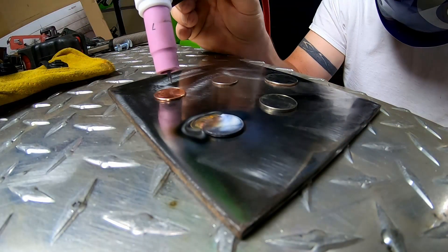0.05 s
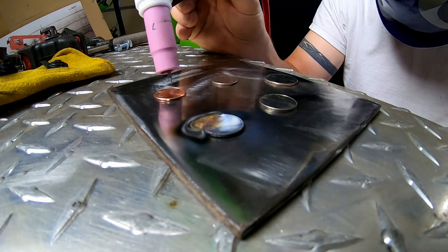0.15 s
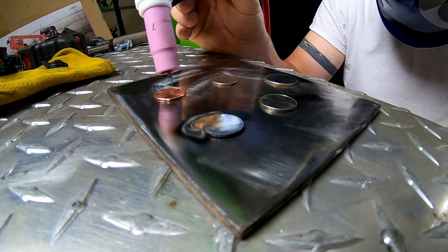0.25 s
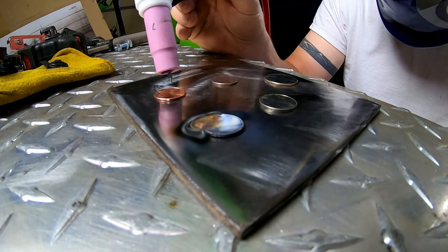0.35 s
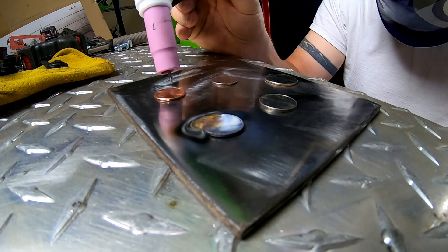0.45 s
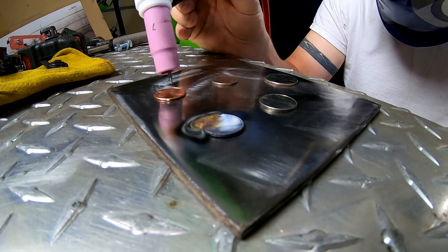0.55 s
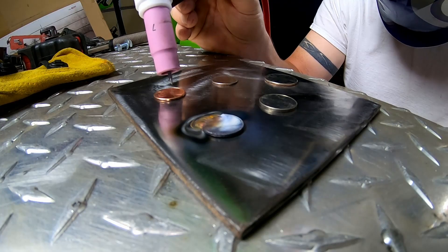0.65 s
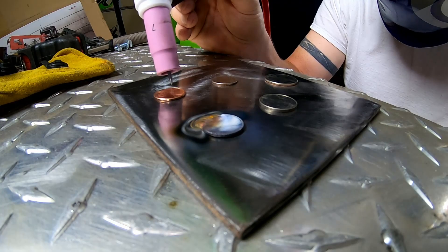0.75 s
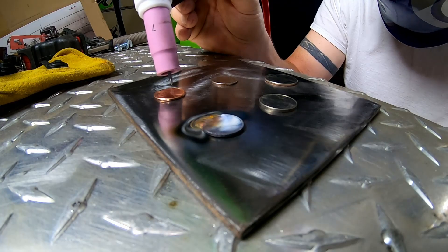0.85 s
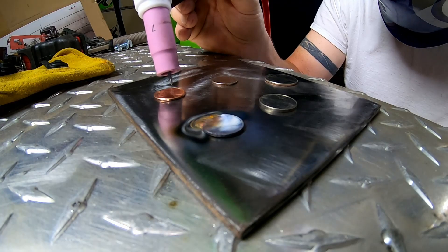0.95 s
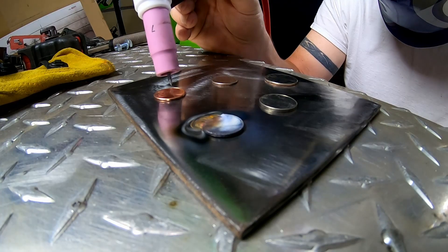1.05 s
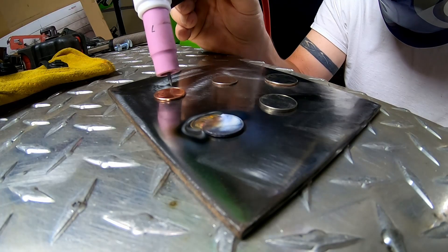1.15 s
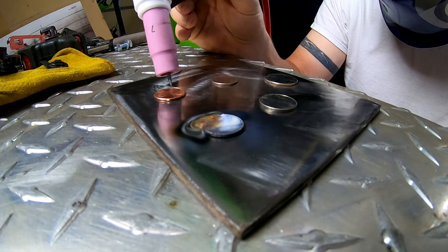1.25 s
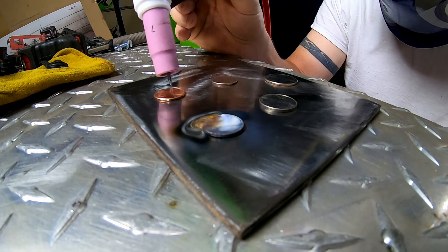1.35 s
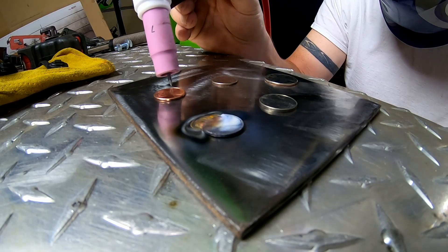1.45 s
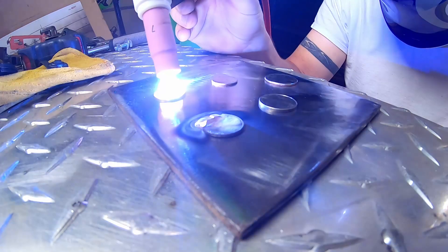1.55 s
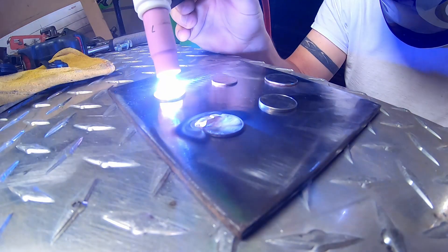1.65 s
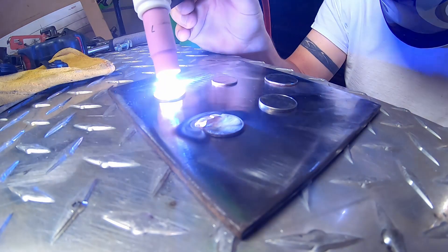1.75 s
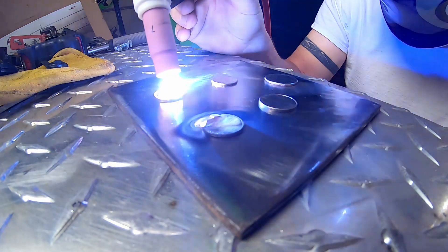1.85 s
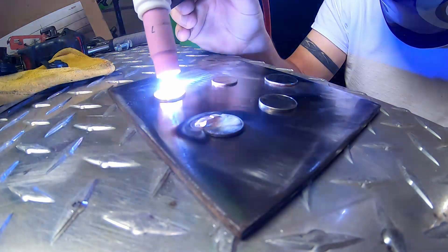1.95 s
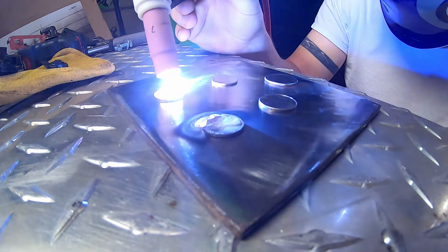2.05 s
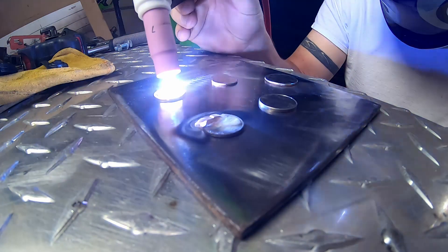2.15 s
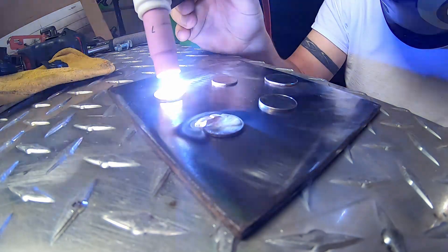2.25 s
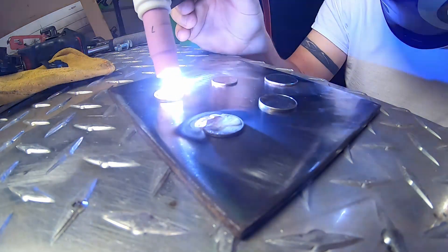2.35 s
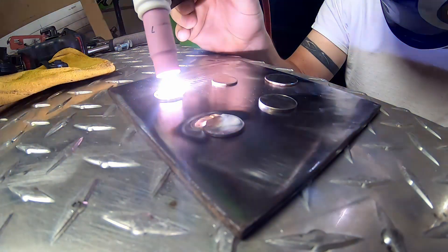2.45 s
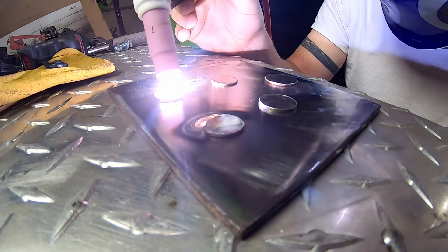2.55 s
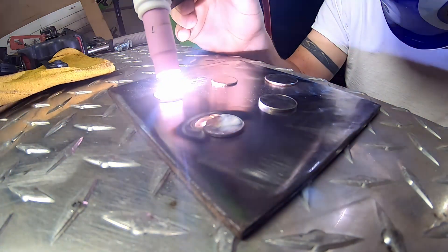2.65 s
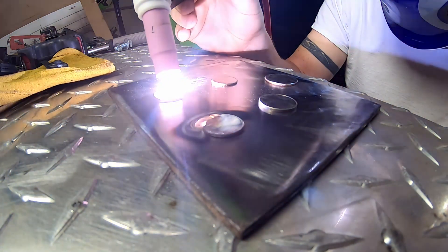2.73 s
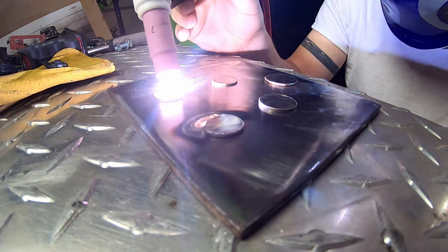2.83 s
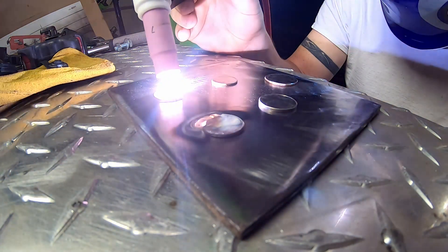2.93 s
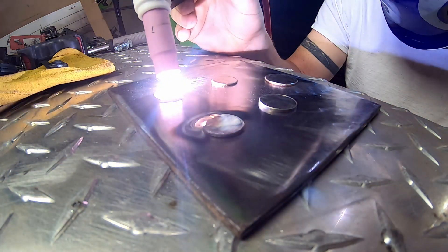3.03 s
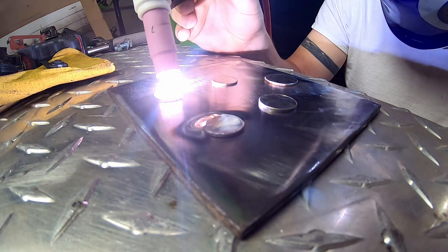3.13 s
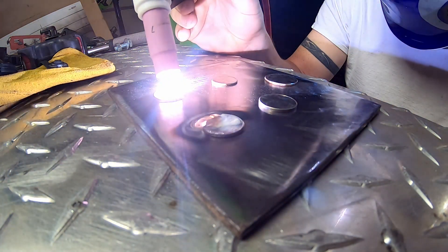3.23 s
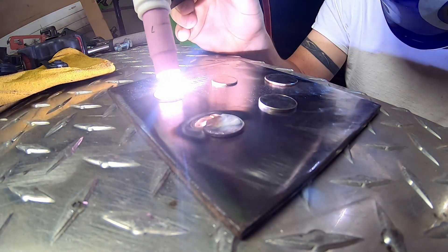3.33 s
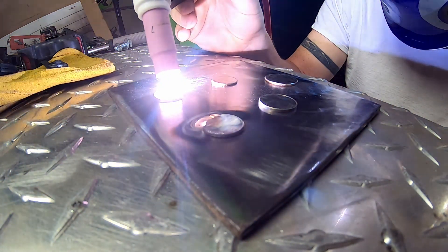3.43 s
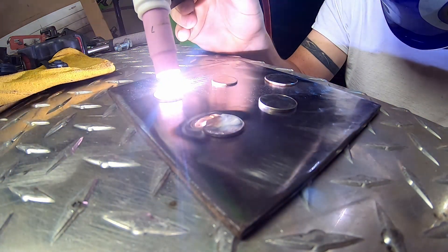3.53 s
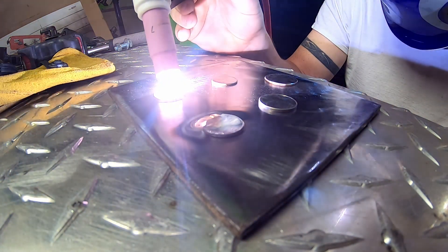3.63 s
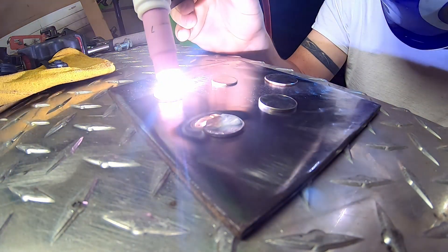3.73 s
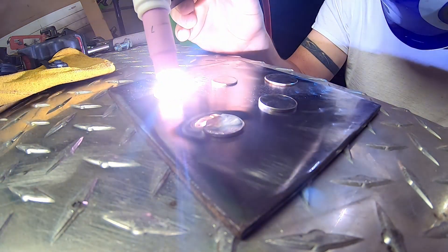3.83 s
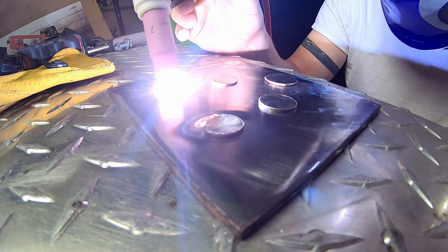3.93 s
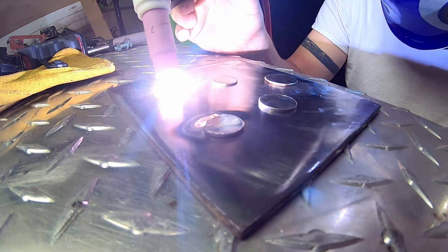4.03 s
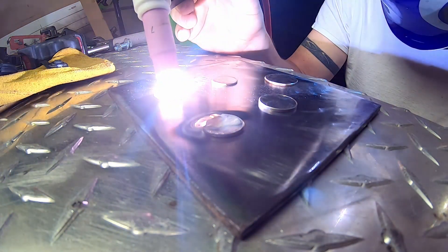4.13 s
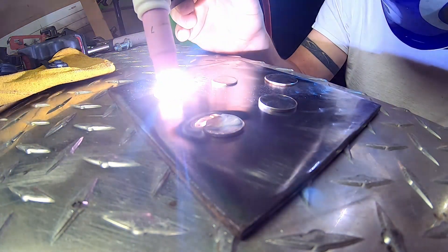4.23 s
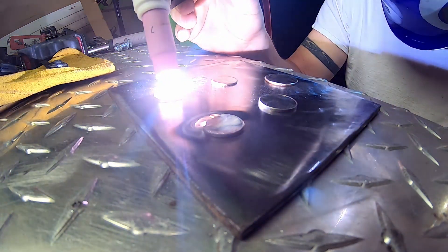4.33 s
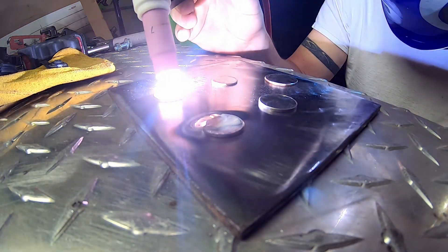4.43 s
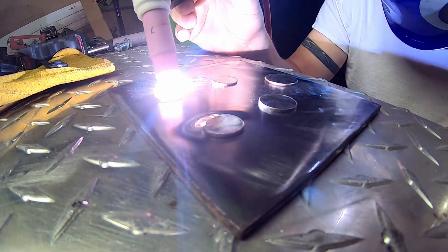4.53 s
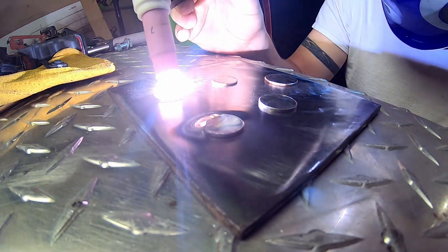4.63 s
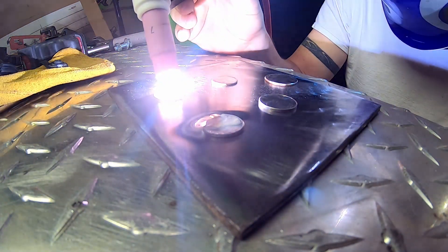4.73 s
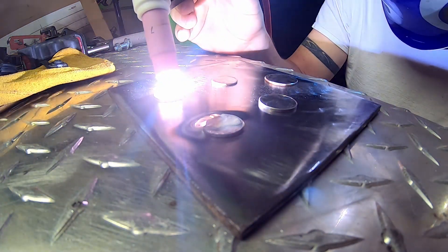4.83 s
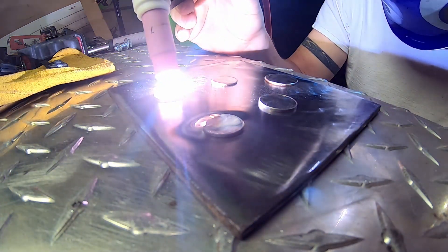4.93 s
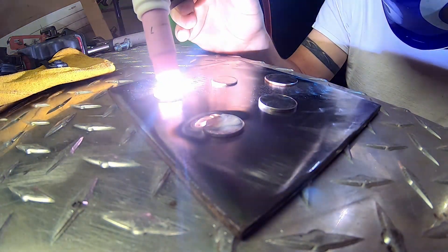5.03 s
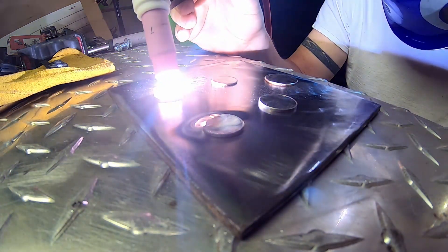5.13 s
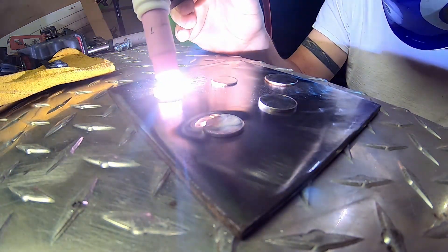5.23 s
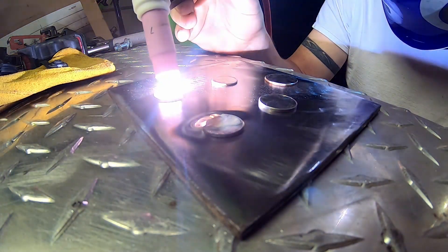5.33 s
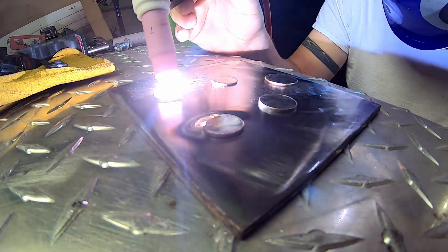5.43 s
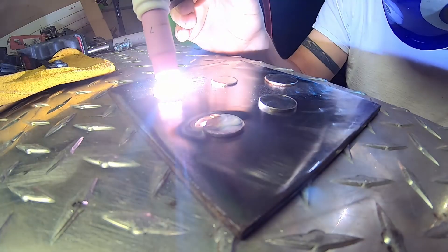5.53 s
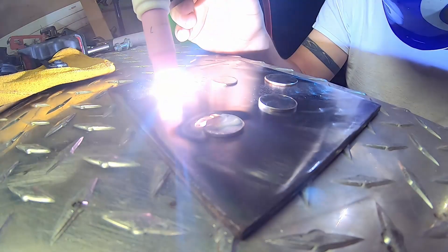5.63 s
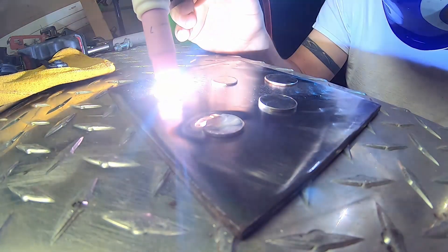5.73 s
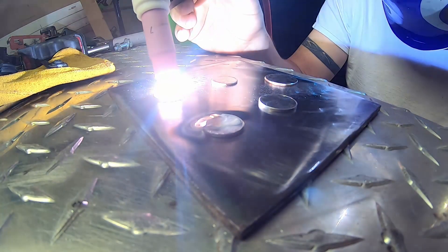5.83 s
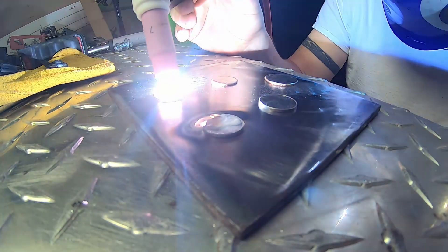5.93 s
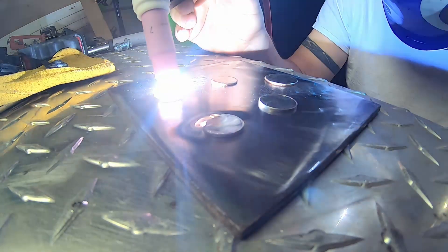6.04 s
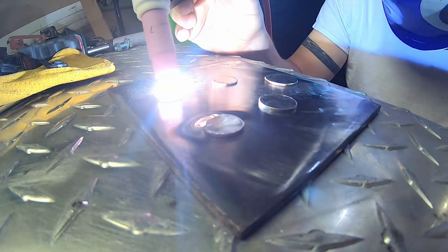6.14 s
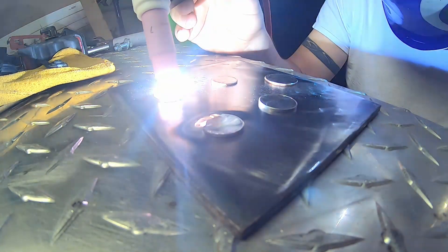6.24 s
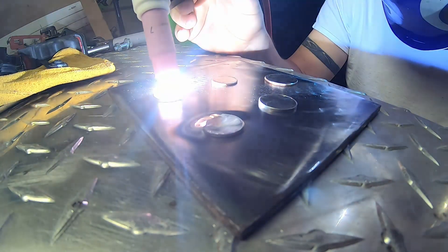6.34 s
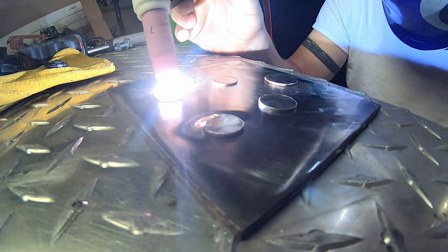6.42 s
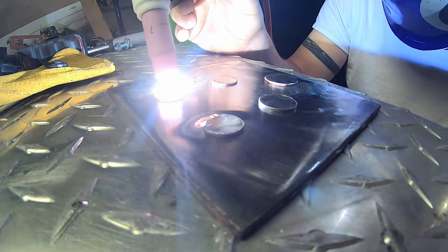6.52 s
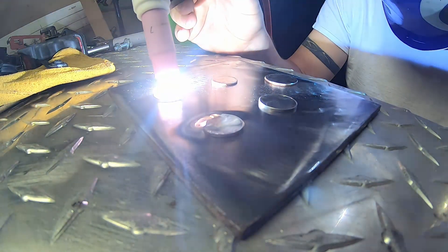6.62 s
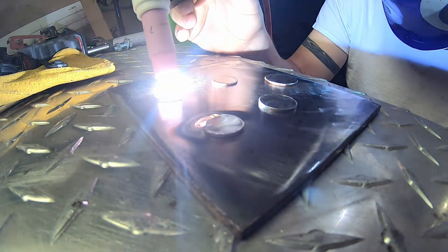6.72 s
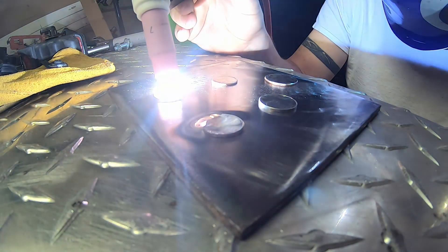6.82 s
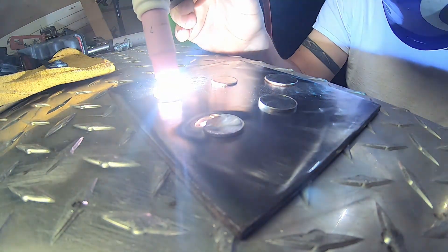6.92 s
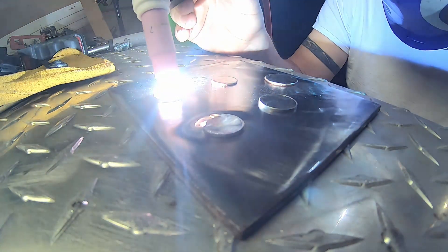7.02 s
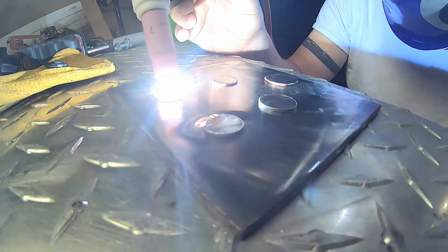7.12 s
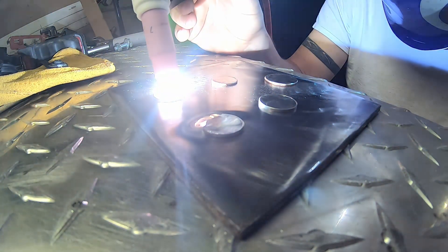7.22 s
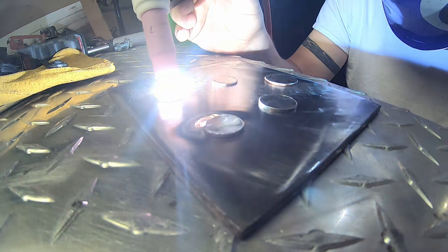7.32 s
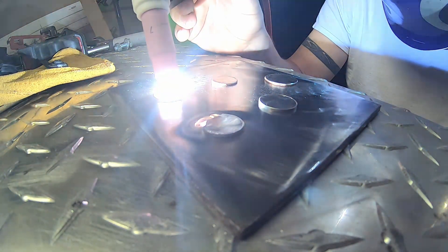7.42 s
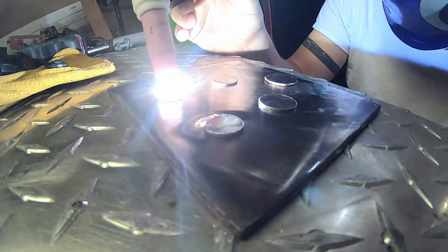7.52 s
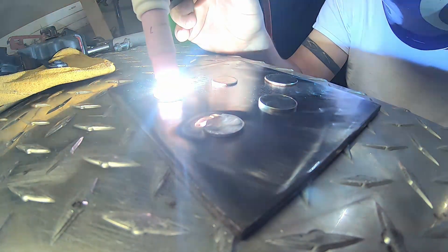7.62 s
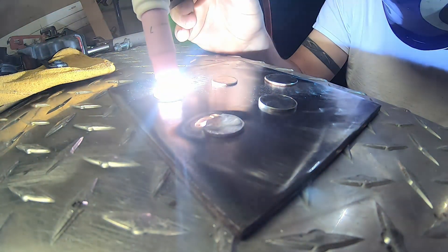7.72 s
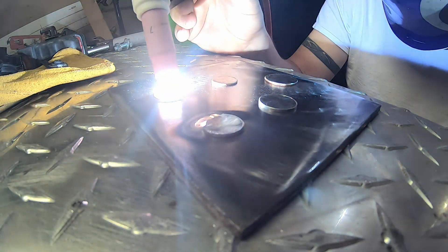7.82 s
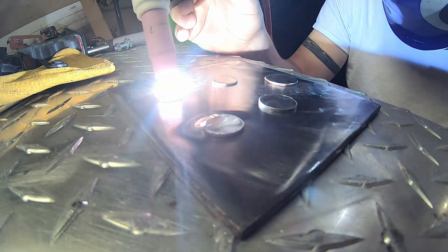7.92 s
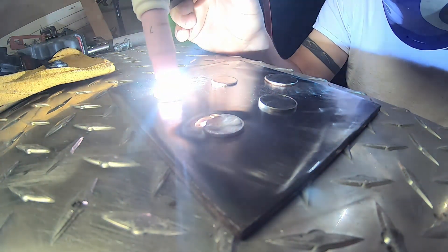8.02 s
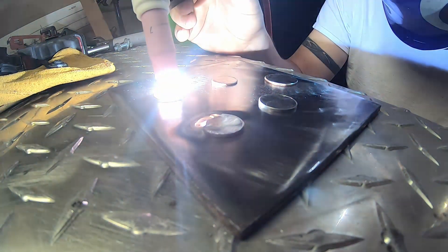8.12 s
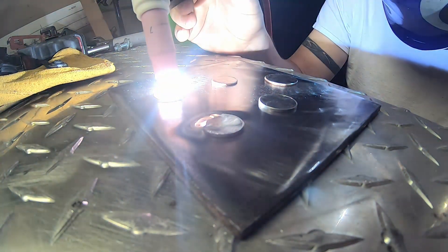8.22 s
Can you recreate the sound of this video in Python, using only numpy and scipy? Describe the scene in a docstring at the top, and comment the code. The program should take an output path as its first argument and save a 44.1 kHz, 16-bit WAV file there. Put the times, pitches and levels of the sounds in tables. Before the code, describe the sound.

Over a whirring fan, a welding torch fizzes, pops alight, crackles for a second, then hisses and whines steadily.

```python
"""First a welder's cooling fan hums and rushes over a faint low rumble. Then a TIG torch welds a coin
to a steel sheet: the starter's sparks fizz, and the arc strikes with a pop that overloads the
microphone. For a second the arc sputters, rasps and spits molten metal. It settles to an even hiss
with the thin whine of its pulsed current, while the shielding gas whistles in the torch's cup."""
import sys
import numpy as np
from scipy import signal
from scipy.fft import rfft, irfft
from scipy.io import wavfile
from scipy.ndimage import map_coordinates

SR = 44100
rng = np.random.default_rng(int(sys.argv[2]) if len(sys.argv) > 2 else 0)


def bounce(signal):
    """Save signal as a 16-bit WAV file at the path given by the first command-line argument."""
    frames = np.transpose(np.atleast_2d(signal))
    limited = np.clip(frames, -1, 1)
    pcm = np.round(limited * 32767).astype(np.int16)
    wavfile.write(sys.argv[1], SR, pcm)


N = 364707
TIME, FREQS = np.arange(N) / SR, np.fft.rfftfreq(N, 1 / SR)
STRIKE_S, PULSE_HZ = 1.60474, 1709.3

# The fan's rushing air. Each row: frequency in Hz, relative level in dB.
AIR_COLOUR = [(20, -27), (60, -5.5), (170, -8), (330, .3), (600, -5), (1000, -4), (1900, -8), (3200, -11.5),
              (4500, -8), (5500, -19.5), (8000, -27), (11000, -36.5), (15600, -39)]
# Where the welder's case and the shop ring. Each row: frequency in Hz, width in Hz, boost in dB.
CASE_RESONANCES = [(68, 7, 2), (219.6, 27.3, 11.5), (247.7, 27.4, 12.5), (312, 20, 1.5), (401, 58, 5),
                   (454.6, 10.5, 11.5), (529, 13, 7), (678, 58, 5), (732, 26, 9), (852, 38, 3.5),
                   (1136, 31, 11), (1195, 16, 8), (1480, 34, 7), (1646, 230, 4)]
# Two fan blade tones that beat slowly. Each row: frequency in Hz, level in dB.
BLADE_TONES = [(397.7, -56), (399.313, -62)]
# The rumble swells and sinks. Each row: time in seconds, level in dB.
RUMBLE_LEVELS = [(0, -72), (.65, -71), (.9, -61), (1.5, -72), (3.0, -71), (3.6, -64), (5.0, -67),
                 (5.7, -63), (6.6, -67.5), (7.3, -61.5), (8.27, -61)]
# The rumble's tone. Each row: frequency in Hz, relative level in dB.
RUMBLE_COLOUR = [(20, -22), (45, -10), (65, 4), (85, -7), (115, 1), (150, -20), (300, -40), (1000, -80)]
# The starter runs until the arc strikes. Each row: time in seconds, level in dB.
STARTER_LEVELS = [(1.548, -63), (1.554, -39), (1.575, -35.5), (1.603, -33.5), (1.612, -70)]
# The starter's fizz. Each row: frequency in Hz, relative level in dB.
STARTER_COLOUR = [(240, -32), (400, -5), (614, -22), (1190, 0.5), (1930, -9), (3060, -4), (4560, -2.5),
                  (6090, -11), (8150, -9.5), (15500, -17)]
# The unsteady arc catches, holds and falters. Each row: time in seconds, level in dB.
SPUTTER_LEVELS = [(1.606, -60), (1.64, -46), (1.67, -38.5), (1.8, -35.5), (2.1, -34), (2.41, -33),
                  (2.445, -39), (2.55, -38), (2.58, -70)]
# The unsteady arc's sizzle. Each row: frequency in Hz, relative level in dB.
SPUTTER_COLOUR = [(60, -30), (140, -11.5), (300, -5), (700, -3), (1300, -5), (2000, 1), (3200, -3.5),
                  (4600, -2), (6000, -3.5), (7800, -6), (9500, 0), (11500, -0.5), (11850, -11.5),
                  (15600, -10.5)]
# The arc flares. Each row: time of the crest in seconds, length in seconds, level in dB,
# treble boost in dB.
FLARES = [(1.95, .04, -35, -1), (2.135, .04, -32, 1), (2.256, 0.086, -28, 3), (2.338, 0.023, -27.5, -1),
          (2.493, .036, -28.8, 3), (2.539, .03, -26.5, 1.5)]
# Peaks and dips of the torch cup above the sheet. Each row: frequency in Hz, width in Hz, boost in dB.
CUP_RESONANCES = [(2400, 520, 2.5), (2670, 190, -6), (3040, 380, 7.5), (3270, 170, -1.5), (3910, 170, 6.5),
                  (4260, 91, -6.5), (4365, 180, 4.5), (4610, 75, 6), (4900, 180.0, -2.5), (5320, 105, 4.5),
                  (5540, 130.0, -4.5), (6450, 250, -9), (6790, 370, 6), (7180, 190.0, 2.5), (8540, 250, -8),
                  (8930, 330.0, 2.5), (9900, 160, -13), (10400, 370.0, 2.5), (12700, 370.0, 3.5),
                  (14960.0, 600.0, -7.6), (15330.0, 340.0, 7)]
# The arc settles. Each row: time in seconds, level in dB, treble boost in dB.
HISS_LEVELS = [(1.62, -70, 0), (1.68, -38.5, 11), (2.6, -44.5, 4), (3.0, -45, 3), (3.75, -45.5, 3.5),
               (4.2, -45.5, 3), (5.5, -45.5, 2), (7.0, -45.5, 2), (8.27, -45.5, 2)]
# The settled arc in its gas. Each row: frequency in Hz, relative level in dB.
HISS_COLOUR = [(150, -23), (400, -5), (700, -4.5), (1300, -5.5), (2000, -2.5), (3200, -0.55), (4600, -0.7),
               (6000, -6.5), (7800, -9), (9500, -17.5), (11500, -21.5), (11850, -30.5), (15600, -33)]
# The pulsed current's whine. Each row: time in seconds, level in dB.
WHINE_LEVELS = [(1.62, -75), (1.68, -41), (1.8, -39), (2.1, -43.5), (2.35, -40.5), (2.6, -47.5), (3.7, -47),
                (4.5, -49.5), (6, -50.5), (8.27, -51)]
# The tones in the whine. Each row: multiple of the pulse rate, relative level in dB.
WHINE_TONES = [(1, -1), (2, -17), (3, -15.5), (4, -17.5), (6, -21), (8, -39)]
# The arc rasps as it catches. Each row: time in seconds, level in dB.
RASP_LEVELS = [(1.63, -70), (1.675, -39), (1.73, -35.5), (1.8, -39), (1.92, -47), (2.1, -67)]
# The rasp's tone. Each row: frequency in Hz, relative level in dB.
RASP_COLOUR = [(100, -23), (550, -2.5), (1300, -25), (2700, -13), (3080, -1.5), (3700, -5), (4400, -13),
               (6000, -30), (15000, -40)]
# Spits of molten metal. Each row: start in seconds, peak level in dB, length of the push in seconds.
SPITS = [(1.7262, -15, 0.00035), (1.745, -25, 0.0006), (2.13, -25, .0002), (2.3275, -22, .00012)]
# The gas whistle's tone. Each row: frequency in Hz, relative level in dB.
WHISTLE_COLOUR = [(1500, -60), (2750, -25), (2950, -5), (3070, -4.5), (3170, -2), (3320, -22), (6000, -60)]
# The workshop's echo. Each row: frequency in Hz, seconds to fade by 60 dB.
ECHO_FADES = [(200, .35), (3000, .38), (9000, .26), (15000, .18)]


def gain_of(db):
    """Turns decibels into a number to multiply by."""
    return 10 ** (np.asarray(db) / 20)


def evened(x):
    """Scales a signal to an average power of one."""
    return x / np.sqrt(np.mean(x ** 2) + 1e-20)


def read(rows, hz=FREQS):
    """Joins the rows of a frequency table with straight lines on a pitch scale."""
    row_hz, values = np.transpose(rows)
    return np.interp(np.log(hz + 1), np.log(row_hz + 1), values)


def follow(rows):
    """Turns a time table into one curve for each column after the time."""
    times, *columns = np.transpose(rows)
    return [np.interp(TIME, times, column) for column in columns]


def during(rows):
    """True from the first to the last row of a time table."""
    return (TIME >= rows[0][0]) & (TIME <= rows[-1][0])


def boosts(resonances):
    """Adds up rounded peaks and dips, in dB at each frequency."""
    return sum(db / (1 + (2 * (FREQS - hz) / width) ** 2) for hz, width, db in resonances)


def coloured(x, shape_db):
    """Turns each frequency up or down, then evens the power to one."""
    return evened(irfft(rfft(x) * gain_of(shape_db), N))


def drift(rate_hz):
    """A smooth random wobble with an average power of one."""
    points = rng.standard_normal(8192)
    return evened(map_coordinates(points, [TIME * 2 * rate_hz], order=3, mode="wrap"))


def crackle(per_s, spread_db):
    """Tiny sparks at random moments, a few much larger than the rest."""
    size = gain_of(spread_db * np.minimum(rng.exponential(1, N), 4))
    return evened(size * rng.choice([-1, 1], N) * (rng.random(N) < per_s / SR))


def brightened(x, boost_db, corner_hz=7000):
    """Raises the treble along a curve and keeps the overall level."""
    treble = irfft(rfft(x) * (1 - 1 / (1 + (FREQS / corner_hz) ** 6)), N)
    share, boost = np.mean(treble ** 2), gain_of(boost_db)
    return (x + (boost - 1) * treble) / np.sqrt(1 + share * (boost ** 2 - 1))


def fan(air_db=-47.5, in_step_s=.24):
    """Air rushes through the case; the blade tones beat and waver in the swirling air."""
    air = coloured(rng.standard_normal(N), read(AIR_COLOUR) + boosts(CASE_RESONANCES))
    out = air * gain_of(air_db + 0.26 * drift(5))
    for hz, db in BLADE_TONES:
        cycles = hz * (TIME - in_step_s) + 0.056 * drift(4)
        level_db = db + drift(7) + drift(0.95)  # a quick flutter and a slow sway
        out += np.sqrt(2) * gain_of(level_db) * np.sin(2 * np.pi * cycles)
    return out


def rumble(bump_s=4.07, bump_db=-54, rise_s=.02, fade_s=.9):
    """A faint, uneven low rumble in the shop, with one soft bump."""
    level_db, = follow(RUMBLE_LEVELS)
    age = np.maximum(TIME - bump_s, 0)
    bump = np.minimum(age / rise_s, 1) * gain_of(bump_db - 60 * age / fade_s)
    level = np.hypot(gain_of(level_db + 1.2 * drift(2.5)), bump)
    return coloured(rng.standard_normal(N), read(RUMBLE_COLOUR)) * level


def starter():
    """High voltage makes a dense stream of small sparks leap from the torch's tip."""
    level_db, = follow(STARTER_LEVELS)
    sparks = coloured(crackle(per_s=9000, spread_db=1.5), read(STARTER_COLOUR))
    return sparks * gain_of(level_db) * during(STARTER_LEVELS)


def strike(height=2.94, hold_s=.00022, fall_s=.00149):
    """The arc lights with one pop, loud enough to clip: a one-sided spike that two bass cuts swing back."""
    age = TIME - STRIKE_S
    spike = -height * (age >= 0) * np.exp(-np.maximum(age - hold_s, 0) / fall_s)
    corner, q = 2 * np.pi * 27.2, .443  # a cut below 27.2 Hz, too damped to ring
    first_cut = signal.bilinear([1, 0, 0], [1, corner / q, corner ** 2], SR)
    second_cut = signal.butter(1, 16.5, "high", fs=SR)
    swing = signal.lfilter(*first_cut, spike + 1e-18)
    return signal.lfilter(*second_cut, swing)


def sputter(cold_treble_db=-0.5, heating_db_per_s=2.0, flare_squareness=3.2):
    """The arc wanders over cold metal, crackling and flaring; it brightens as the metal heats."""
    level_db, = follow(SPUTTER_LEVELS)
    power = gain_of(level_db) ** 2
    # The arc and its flares each set the treble by their share of the power.
    weighted_treble = power * (cold_treble_db + heating_db_per_s * (TIME - STRIKE_S))
    for crest_s, length_s, db, treble_db in FLARES:
        distance = abs(2 * (TIME - crest_s) / length_s)
        flare = gain_of(db) ** 2 * np.exp(-np.minimum(distance ** flare_squareness, 20))
        power += flare
        weighted_treble += flare * treble_db
    noise = crackle(per_s=6000, spread_db=3.0) + gain_of(0.5) * rng.standard_normal(N)
    sizzle = coloured(noise, read(SPUTTER_COLOUR) + boosts(CUP_RESONANCES))
    sizzle = brightened(sizzle, weighted_treble / power)
    flicker = gain_of(0.95 * drift(70))
    return sizzle * np.sqrt(power) * flicker * during(SPUTTER_LEVELS)


def hiss(pulse_cycles, throb=0.18, ticks_db=-12):
    """The settled arc hisses, a little more as each pulse of current starts and stops."""
    level_db, treble_db = follow(HISS_LEVELS)
    rush = rng.standard_normal(N) * (1 + throb * np.cos(4 * np.pi * pulse_cycles))
    ticks = gain_of(ticks_db) * crackle(per_s=700, spread_db=4)
    noise = coloured(rush + ticks, read(HISS_COLOUR) + boosts(CUP_RESONANCES))
    return brightened(noise, treble_db) * gain_of(level_db + 0.17 * drift(9.2)) * (TIME > STRIKE_S)


def whine(pulse_cycles, shimmer_db=1.0):
    """Each pulse of current swells the arc, making a thin tone with shimmering overtones."""
    level_db, = follow(WHINE_LEVELS)
    tone = np.zeros(N)
    for multiple, db in WHINE_TONES:
        strength = gain_of(db + shimmer_db * drift(20))
        tone += strength * np.sin(2 * np.pi * (multiple * pulse_cycles + rng.random()))
    return np.sqrt(2) * gain_of(level_db) * tone * (TIME > STRIKE_S)


def rasp():
    """The young arc crackles and makes the gas cup ring."""
    level_db, = follow(RASP_LEVELS)
    pops = coloured(crackle(per_s=2500, spread_db=4.0), read(RASP_COLOUR))
    return pops * gain_of(level_db) * during(RASP_LEVELS)


def spits():
    """Each spit of molten metal is a tiny blast: a push of air, then a longer pull."""
    out = np.zeros(N)
    for start_s, db, push_s in SPITS:
        progress = np.maximum(TIME - start_s, 0) / push_s
        out += gain_of(db) * (TIME >= start_s) * (1 - progress) * np.exp(-np.minimum(progress, 50))
    return out


def whistle(start_s=2.55, rise_s=0.4, level_db=-55.5, surge_db=2.2):
    """Gas streams past the rim of the cup and makes it whistle in uneven surges."""
    fade_in = np.clip((TIME - start_s) / rise_s, 0, 1)
    flow = fade_in * gain_of(level_db + surge_db * drift(4))
    return coloured(rng.standard_normal(N), read(WHISTLE_COLOUR)) * flow


def workshop(x, echo_db=-9):
    """Adds dense echoes from the bench and walls; the highest pitches fade first."""
    hz, seconds, bands = signal.stft(rng.standard_normal(SR // 2), SR, nperseg=256)
    fade = gain_of(-60 * seconds / read(ECHO_FADES, hz)[:, None])
    _, tail = signal.istft(bands * fade, SR, nperseg=256)
    echo = signal.fftconvolve(x, tail / np.linalg.norm(tail))[:N]
    return (x + gain_of(echo_db) * echo) / np.hypot(1, gain_of(echo_db))


def scene():
    """Mixes the fan, the rumble and the weld, the same in both channels."""
    pulse_cycles = PULSE_HZ * TIME + 0.019 * drift(15)  # hiss and whine share one wavering pulse
    arc_noise = starter() + rasp() + sputter() + spits() + hiss(pulse_cycles)
    weld = workshop(arc_noise) + whine(pulse_cycles) + whistle()
    return np.tile(fan() + rumble() + weld + strike(), (2, 1))


def record(dry, top_hz=15800):
    """The strike overloads the input and clips; then the highest treble is cut."""
    lowpass = signal.firwin(611, top_hz, window=("kaiser", 8), fs=SR)
    return signal.oaconvolve(np.clip(dry, -1, 1), lowpass[None], "same", axes=1)


dry = scene()
out = record(dry)
bounce(out)
```